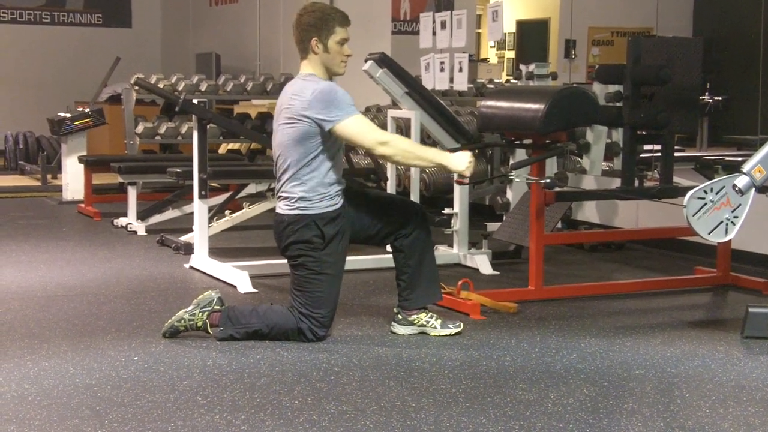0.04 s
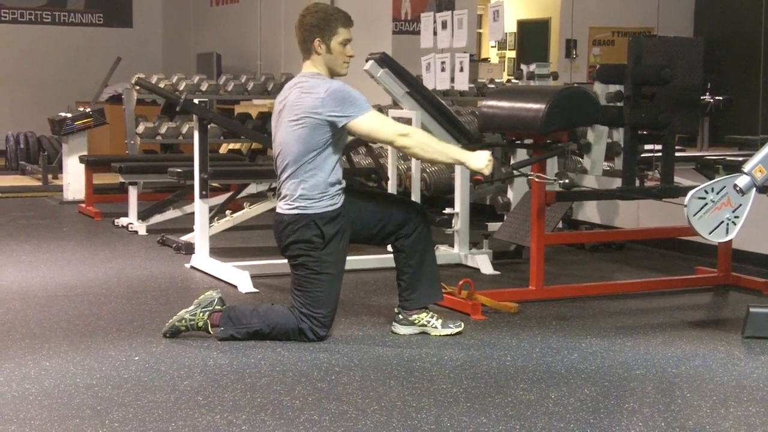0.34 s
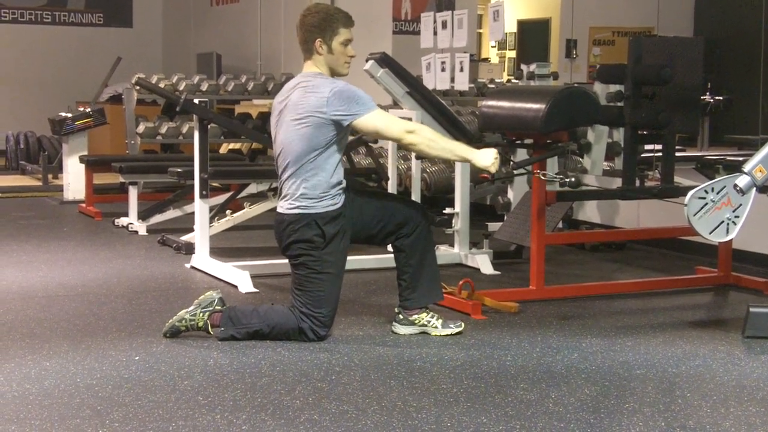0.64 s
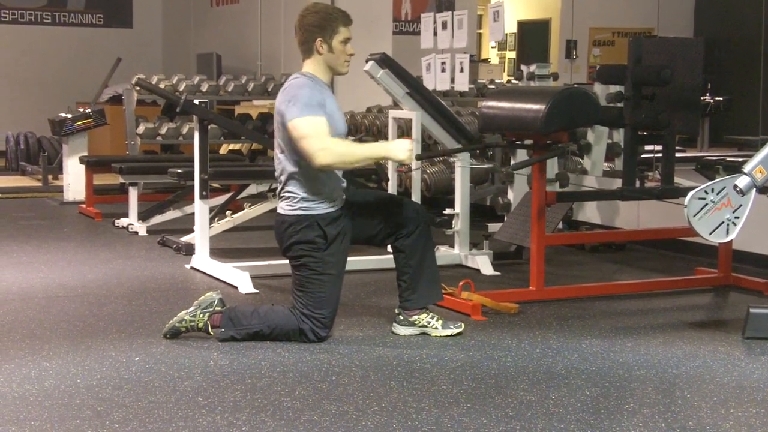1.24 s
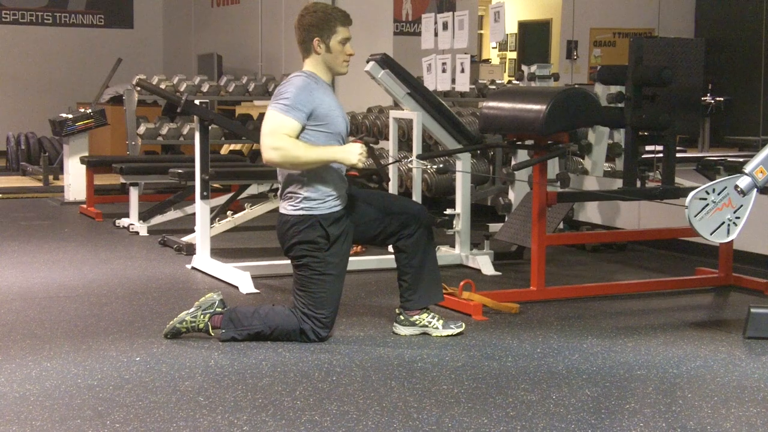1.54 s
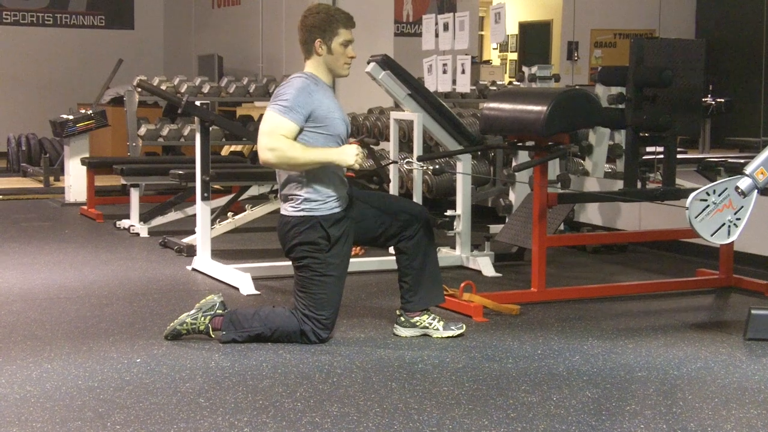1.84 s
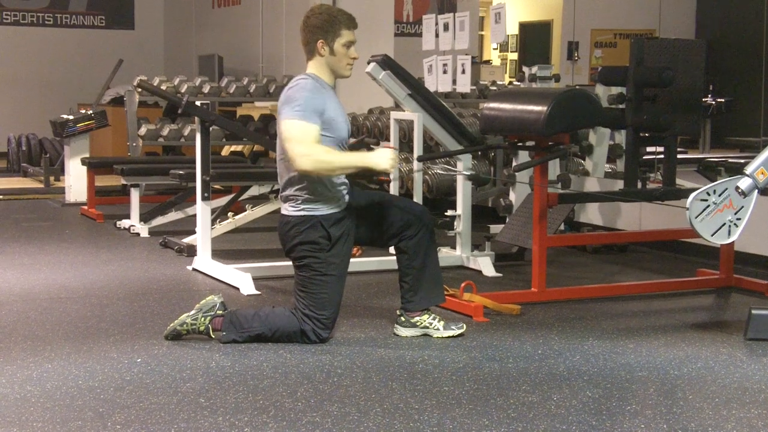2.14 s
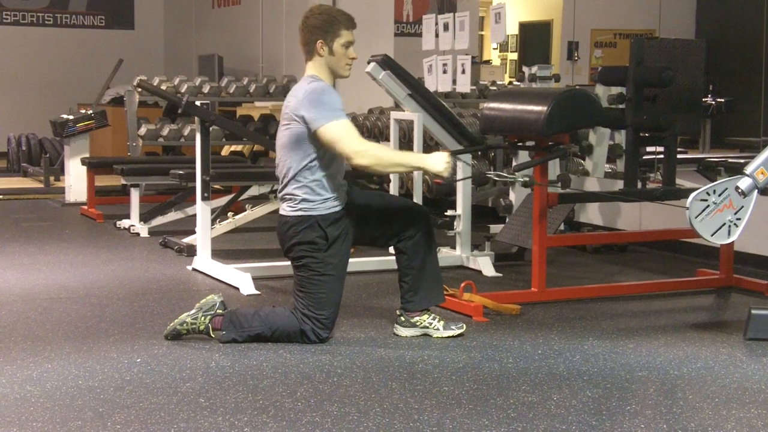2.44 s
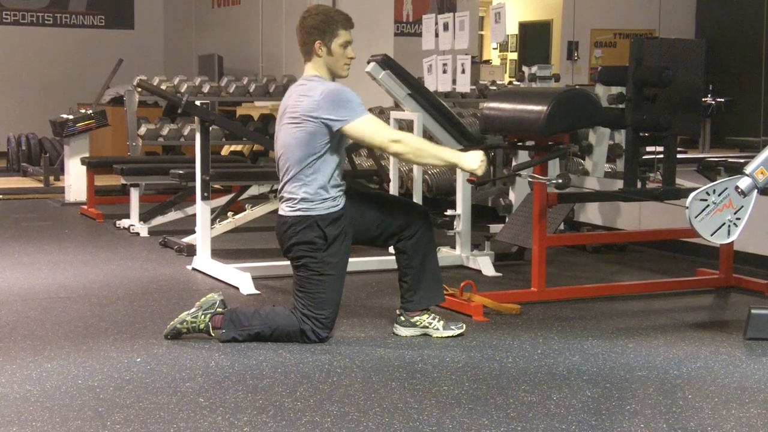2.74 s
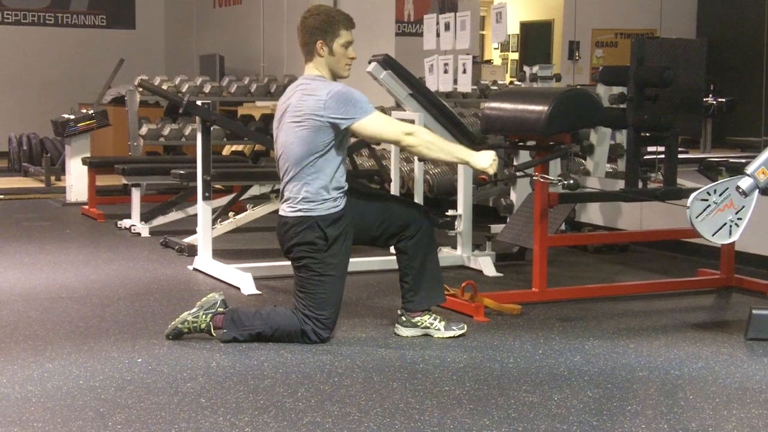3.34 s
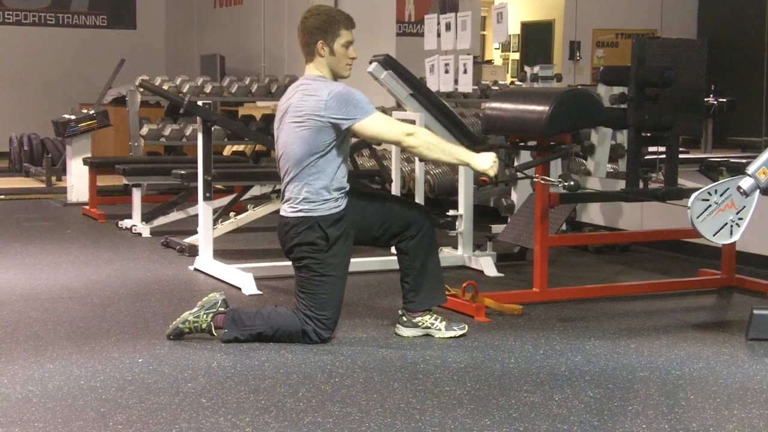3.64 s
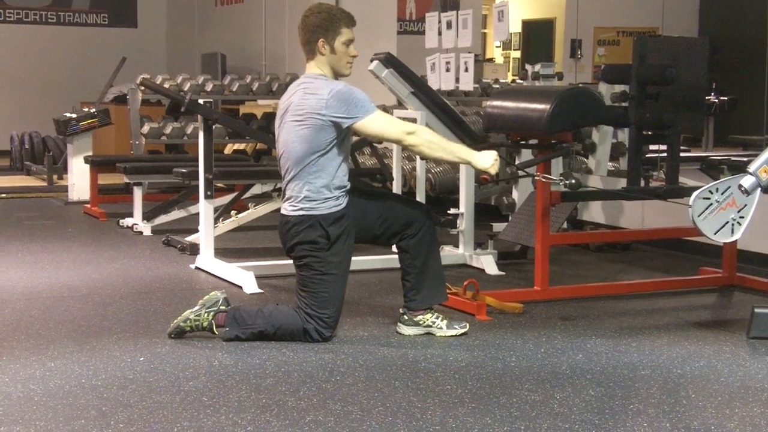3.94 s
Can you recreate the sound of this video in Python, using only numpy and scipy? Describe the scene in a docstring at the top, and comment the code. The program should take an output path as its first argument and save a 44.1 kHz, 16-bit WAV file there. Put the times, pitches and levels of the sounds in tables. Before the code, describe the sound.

A cable exercise machine drones softly over its pulleys, once out and once more quietly back, ending with a light rustle and tiny ticks. Behind it are a large gym's steady ventilation hum, thin lamp buzz and faint microphone hiss.

```python
"""Room tone of a large gym, almost mono, with microphone hiss and a notch in the treble.
From the start, ventilation rumbles in its ducts, fans sing faintly and lamps buzz thin and high.
At 1 s a cable machine rolls softly through a pull, its strands drumming over a pulley.
A quieter return follows just after 2 s, and a very high whistle comes on for half a second.
Near the end the machine stirs with a soft rustle and three ticks of its fittings."""
import sys
import numpy as np
from scipy import signal
from scipy.fft import rfft, irfft
from scipy.io import wavfile
from scipy.ndimage import uniform_filter1d

SR = 44100
rng = np.random.default_rng(int(sys.argv[2]) if len(sys.argv) > 2 else 0)


def put_to_file(sound):
    """Save the sound as 16-bit audio at rate SR, in the file named by the first command-line argument."""
    columns = np.atleast_2d(sound).T  # one column per channel
    safe = np.clip(columns, -1, 1)
    whole_steps = np.round(safe * 32767)
    wavfile.write(sys.argv[1], SR, whole_steps.astype(np.int16))


N = 176400

# Air bed of the ventilation. Each row: frequency in Hz, density in dB per Hz.
AIR_SPECTRUM = [(18, -52.5), (30, -59.5), (40, -56.5), (70, -67.5), (100, -62.5), (150, -73), (210, -75),
                (300, -82), (450, -87), (620, -81.5), (820, -82), (1050, -86.5), (1330, -87), (1700, -88.5),
                (3100, -91), (5000, -95.5), (6300, -94), (7500, -104), (9000, -112), (11000, -119),
                (15000, -118)]
# Fader moves for the blower's throb and for its hum. Each row: time in seconds, level in dB.
THROB_FADER = [(0, -43), (.4, -50), (.58, -45), (.9, -41), (1.03, -52.5), (1.26, -40.5), (1.55, -54),
               (2.1, -48.5), (2.45, -49), (2.65, -37), (3.05, -54), (3.27, -42.5), (3.65, -61), (4, -49)]
HUM_FADER = [(0, -45), (.2, -42.5), (.5, -52.5), (.8, -50), (.98, -42), (1.15, -54), (1.36, -40),
             (1.5, -58), (1.73, -44), (1.87, -55.5), (2.02, -44), (2.2, -59), (2.5, -47), (2.8, -43),
             (3.05, -50.5), (3.3, -42.5), (3.55, -54), (3.85, -41), (4, -47.5)]
# Duct resonances. Each row: pitch in Hz, width in Hz, level in dB.
DUCT_MODES = [(136, 6.2, -58.5), (178, 6.7, -60), (206.2, 4.6, -62), (282, 10, -68.5), (513.8, 14, -67.5),
              (588, 17, -72.5), (657, 21, -70), (829.6, 14, -68), (859, 9.9, -68.5), (1237, 39, -70.5),
              (1366, 26, -71.5)]
# Singing fans. Each row: pitch in Hz, level in dB.
FAN_TONES = [(480, -75), (721, -69.5), (763, -67.5), (794, -74.5), (824, -68.5), (924, -76.5),
             (1018, -75.5), (1103, -69.5), (1200, -73)]
# Strong partials of the lamp buzz: first their multiples of the mains, then their levels in dB.
LAMP_HARMONICS = [86, 98, 100, 107, 108, 109, 110, 111, 112, 113, 118, 122, 134, 136]
LAMP_LEVELS_DB = [-75, -72.5, -70, -77, -63, -74, -65, -78.5, -72.5, -79, -82, -80.5, -88.5, -95]
# Fizz of weak mains partials. Each row: frequency in Hz, level per partial in dB.
FIZZ_SPECTRUM = [(4900, -101), (5700, -96.5), (6500, -89), (7200, -88), (8100, -95.5), (9600, -105)]
# Faint whines of electronics. Each row: pitch in Hz, level in dB.
WHINE_TONES = [(8452, -90.5), (8484, -92), (8990, -92), (9022, -88.5)]
# Partials of the high whistle. Each row: pitch in Hz, width in Hz, level in dB.
WHISTLE_BANDS = [(12230, 260, -89), (13050, 230, -82), (13700, 900, -86)]
# Colour of the rustle and of the ticks. Each row: frequency in Hz, density in dB per Hz.
RUSTLE_SPECTRUM = [(150, -80), (350, -83.5), (800, -82), (1500, -101), (3000, -95), (8000, -110),
                   (14000, -120)]
TICK_SPECTRUM = [(1000, -81), (4000, -91), (7000, -94), (9000, -107), (11000, -106), (15000, -120)]
# Ticks of the cable fittings. Each row: start in seconds, gain in dB.
TICK_CUES = [(3.834, -9), (3.855, 0), (3.872, 3)]
# Pulley rumble. Each row: frequency in Hz, density in dB per Hz.
PULLEY_SPECTRUM = [(125, -79), (170, -69), (230, -71.5), (300, -84.5), (400, -80.5), (520, -90),
                   (1200, -93), (3000, -104), (8000, -112), (12000, -125)]
# Resonances of the rolling pulleys. Each row: pitch in Hz, width in Hz, level in dB.
PULLEY_RESONANCES = [(175.6, 28, -54), (407, 34, -60.5)]
# Pull and return. Each row: start in seconds, length in seconds, gain in dB, top pitch in Hz.
STROKE_CUES = [(1.038, 0.44, 0, 227), (2.142, 0.383, -4, 219)]
# Microphone hiss. Each row: frequency in Hz, density in dB per Hz.
HISS_SPECTRUM = [(40, -78.5), (120, -110), (600, -124), (1000, -144), (7000, -144), (8300, -117),
                 (12500, -116), (15000, -120)]
# The recorder's steady offsets, left then right, as shares of full scale.
DC_OFFSETS = [.0255, .0077]


def undb(db):
    return 10 ** (np.asarray(db) / 20)


def contour(hz, points):
    """EQ curve: gain through (Hz, dB) points joined on a log-frequency axis."""
    at, db = np.array(points, float).T
    return undb(np.interp(np.log(np.maximum(hz, 1)), np.log(at), db))


def bins():
    """Frequency of each spectral bin."""
    return np.arange(N // 2 + 1) * SR / N


def noise(points):
    """Noise coloured by (Hz, dB per Hz) points."""
    return irfft(rfft(rng.standard_normal(N)) * contour(bins(), points), N) * np.sqrt(SR / 2)


def resonance(hz, width_hz):
    """Noise ringing in one steep resonance, rms 1."""
    ring = irfft(rfft(rng.standard_normal(N)) / (1 + (2 * (bins() - hz) / width_hz) ** 2), N)
    return ring / ring.std()


def drift(per_s):
    """Smooth random modulation with a spread near 1."""
    hold = int(SR / max(per_s, .5))
    steps = np.repeat(rng.standard_normal(N // hold + 1), hold)
    return 1.3 * uniform_filter1d(uniform_filter1d(steps, hold), hold)[:N]


def tone(hz, phase):
    """A sine of rms 1 on a steady or moving pitch."""
    return np.sqrt(2) * np.cos(2 * np.pi * np.cumsum(hz * np.ones(N)) / SR + phase)


def drone(hz, wander_hz, flutter_per_s=30, flutter_db=2.5):
    """A low note whose pitch and level flutter."""
    note = tone(hz + wander_hz * drift(flutter_per_s), 2 * np.pi * rng.random())
    return note * undb(flutter_db * drift(flutter_per_s))


def ventilation(t, air_trim_db=.5, surge_db=3, fan_wander=.00121, fan_waver_db=2):
    """The bed: air rushes, the blower throbs and hums an octave up, ducts ring and fans waver."""
    air = undb(air_trim_db) * noise(AIR_SPECTRUM)
    throb = undb(np.interp(t, *np.array(THROB_FADER).T)) * drone(hz=57, wander_hz=4.5)
    hum = undb(np.interp(t, *np.array(HUM_FADER).T)) * drone(hz=116, wander_hz=3.6)
    ducts = sum(undb(db) * resonance(hz, width) for hz, width, db in DUCT_MODES)
    fans = np.zeros(N)
    for hz, db in FAN_TONES:
        pitch = hz * (1 + fan_wander * drift(per_s=6.08))
        fans += undb(db + fan_waver_db * drift(per_s=3.9)) * tone(pitch, 0)
    surge = undb(surge_db * drift(per_s=3))
    return air + throb + hum + ducts * surge + fans


def lamps(mains_hz=60.009, ring_hz=6510, ring_width_hz=170, scatter_db=3.5):
    """Lamps kick a high resonance twice a mains cycle, over a fizz of weak partials."""
    orders = np.array(LAMP_HARMONICS)
    ring_phase = -np.arctan(2 * (orders * mains_hz - ring_hz) / ring_width_hz)
    spread_rad = np.where(orders % 2, 1.4, .5)  # odd partials make the two kicks a little unlike
    phases = ring_phase + rng.standard_normal(len(orders)) * spread_rad
    buzz = sum(undb(db) * tone(k * mains_hz, p) for k, db, p in zip(orders, LAMP_LEVELS_DB, phases))
    fizz_hz = np.setdiff1d(np.arange(82, 160), orders) * mains_hz
    gains = contour(fizz_hz, FIZZ_SPECTRUM) * undb(scatter_db * rng.standard_normal(len(fizz_hz)))
    fizz = sum(gain * tone(hz, 2 * np.pi * rng.random()) for hz, gain in zip(fizz_hz, gains))
    return buzz + fizz


def electronics(t, on_s=2.36, off_s=2.85):
    """Steady faint whines, and a very high whistle that switches on briefly."""
    whines = sum(undb(db) * tone(hz, 2 * np.pi * rng.random()) for hz, db in WHINE_TONES)
    gate = uniform_filter1d(1. * ((t > on_s) & (t < off_s)), size=441)  # 10 ms fades
    whistle = sum(undb(db) * resonance(hz, width) for hz, width, db in WHISTLE_BANDS)
    return whines + gate * whistle


def fittings(t, tick_decay_s=.005, rustle_peak_s=3.85, rustle_half_s=.08):
    """The machine stirs: the cable fittings tick inside a soft swell of rustle."""
    ticks = sum(undb(db) * (t >= at) * np.exp(-np.abs(t - at) / tick_decay_s) for at, db in TICK_CUES)
    swell = np.exp(-((t - rustle_peak_s) / rustle_half_s) ** 2)
    return swell * noise(RUSTLE_SPECTRUM) + ticks * noise(TICK_SPECTRUM)


def pulleys(t, attack_s=.12, decay_s=.29):
    """Pulley rumble builds with each stroke, holds while the cable runs and dies away in the hall."""
    envelope = np.zeros(N)
    for start, length, db, _ in STROKE_CUES:
        attack = np.clip((t - start) / attack_s, 0, 1)
        tail = np.exp(-np.maximum(t - start - length, 0) / decay_s)
        envelope += undb(db) * attack * tail
    ringing = sum(undb(db) * resonance(hz, width) for hz, width, db in PULLEY_RESONANCES)
    return envelope * (noise(PULLEY_SPECTRUM) + ringing)


def cable_note(t, start, length, top_hz, sag_hz=10):
    """The cable's strands drum over a pulley: the note rises and swells with the stroke's speed."""
    peak_s, half_width_s = start + .668 * length, .54 * length
    speed = np.exp(-((t - peak_s) / half_width_s) ** 2)
    return speed * drone(top_hz - sag_hz * (1 - speed), wander_hz=2)


def cable_machine(t, note_db=-48.5):
    """The main source: the cable drones over rolling pulleys, out and back, then the fittings stir."""
    notes = sum(undb(note_db + db) * cable_note(t, start, length, hz)
                for start, length, db, hz in STROKE_CUES)
    return notes + pulleys(t) + fittings(t)


def scene():
    """The mix, with every layer dead centre."""
    t = np.arange(N) / SR
    room = lamps() + cable_machine(t) + electronics(t) + ventilation(t)
    return np.array([room, room])


def record(dry):
    """The recorder adds each channel's own hiss, notches the treble, cuts the top and leaves offsets."""
    notch_hz, notch_width_hz, top_hz = 4210, 2640, 15050
    hissy = dry + np.array([noise(HISS_SPECTRUM), noise(HISS_SPECTRUM)])
    from_notch_hz = bins() - notch_hz
    notch = from_notch_hz / (from_notch_hz - 1j * notch_width_hz / 2)
    notched = irfft(rfft(hissy) * notch, N)
    high_cut = signal.ellip(10, .1, 70, top_hz, fs=SR, output="sos")
    return signal.sosfilt(high_cut, notched) + np.array(DC_OFFSETS)[:, None]


dry = scene()
out = record(dry)
put_to_file(out)
```